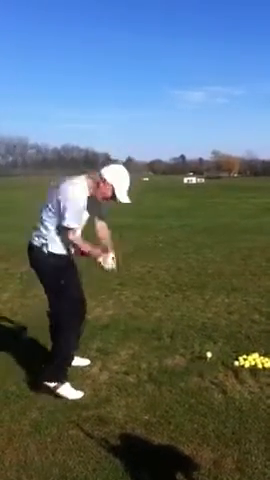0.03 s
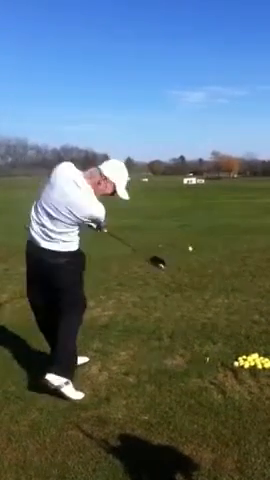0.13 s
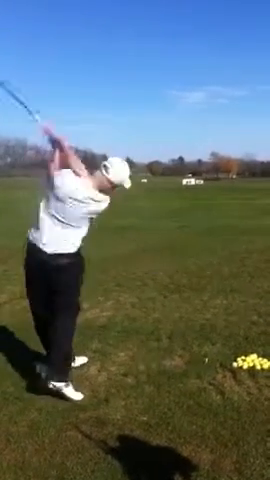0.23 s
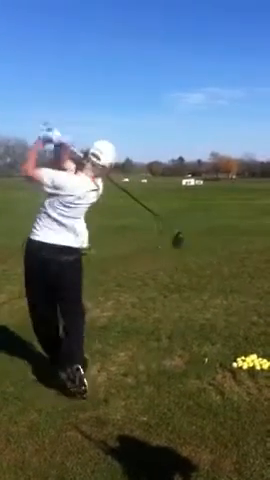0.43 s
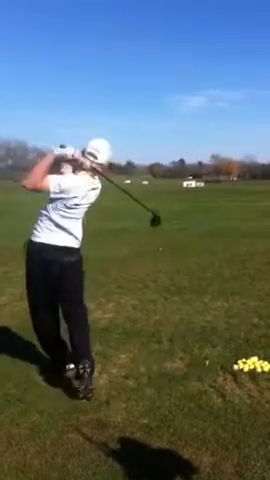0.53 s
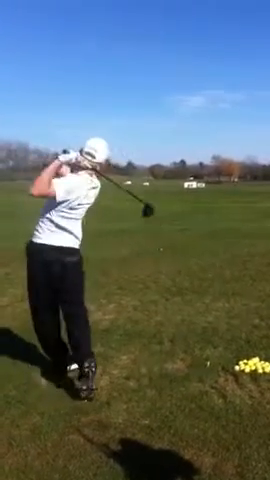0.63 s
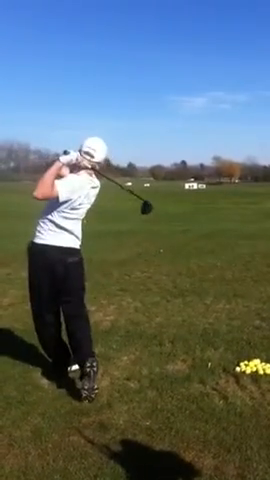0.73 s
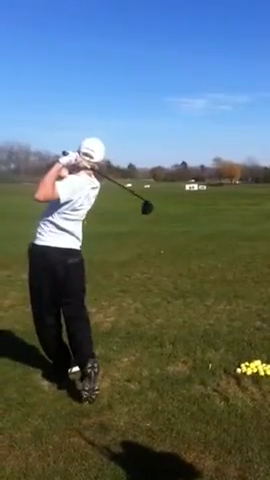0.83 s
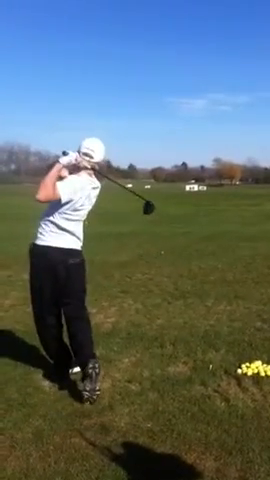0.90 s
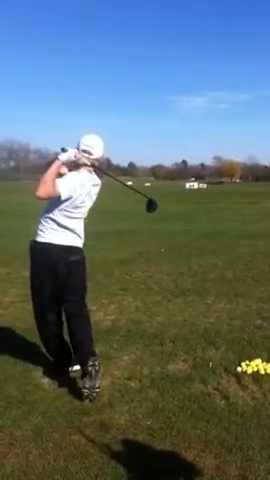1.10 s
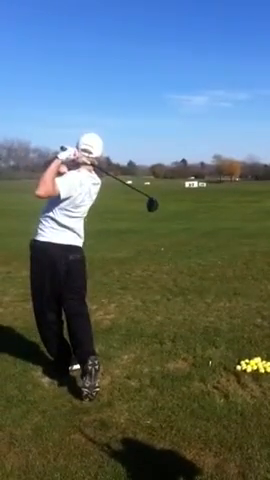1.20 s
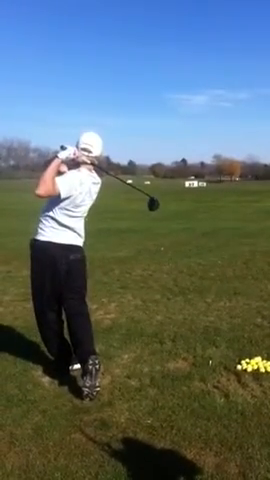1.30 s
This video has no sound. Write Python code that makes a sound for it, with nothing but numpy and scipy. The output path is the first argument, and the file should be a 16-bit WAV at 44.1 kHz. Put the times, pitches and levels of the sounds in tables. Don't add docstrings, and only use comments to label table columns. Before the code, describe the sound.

Golf shot on an open grass range: a fast rising whoosh, a sharp hollow metal crack with brief ringing and scattered echoes, then faint hum, hiss and a dull far strike, on a phone microphone.

```python
import sys
import numpy as np
from scipy import signal
from scipy.fft import rfft, irfft, next_fast_len
from scipy.io import wavfile
from scipy.ndimage import map_coordinates

SR = 44100
rng = np.random.default_rng(int(sys.argv[2]) if len(sys.argv) > 2 else 0)


def generate_wav(sig):
    pcm = np.round(np.clip(np.atleast_2d(sig).T, -1, 1) * 32767).astype(np.int16)
    wavfile.write(sys.argv[1], SR, pcm)


def nominal_scale(level):
    x = np.asarray(level, float) / 20
    return 10 ** x


N = 59535
T = np.arange(N) / SR
HIT_S = 0.2479


def unit(x):
    return x / np.sqrt(np.mean(x ** 2) + 1e-20)


def along(points, hz):
    point_hz, value = np.transpose(points)
    return np.interp(np.log(hz + 1), np.log(point_hz + 1), value)


def wobble(rate):
    return map_coordinates(rng.standard_normal(size=600), [T * rate])


def filtered(x, response):
    size = next_fast_len(len(x) + 8192)
    spectrum = rfft(x, size) * response(np.fft.rfftfreq(size, 1 / SR))
    return irfft(spectrum, size)[:len(x)]


def low_cut(hz, corner_hz):
    return (1j * hz / (corner_hz + 1j * hz)) ** 2


def noise(spectrum, size=N):
    return unit(filtered(rng.standard_normal(size), lambda hz: nominal_scale(along(spectrum, hz))))


def narrow(hz, width_hz):
    def slow_noise():
        return filtered(rng.standard_normal(N), lambda f: 1 / (1 + (2 * f / width_hz) ** 2))

    phase = 2 * np.pi * np.cumsum(hz * np.ones(N)) / SR
    return unit(slow_noise() * np.cos(phase) + slow_noise() * np.sin(phase))


def burst(t60):
    return nominal_scale(-60 * T / t60) * rng.standard_normal(N)


def ring(modes, rise_s, rough_db):
    total = np.zeros(N)
    for hz, db, t60 in modes:
        level_db = db - 60 * T / t60 + rough_db * wobble(260)
        total += nominal_scale(level_db) * np.sin(2 * np.pi * hz * T)
    return (1 - np.exp(-T / rise_s)) * total


def placed(x, s):
    return np.pad(x, (round(s * SR), N))[:N]


def background():
    # pitch_hz [Hz], level_db [dB per Hz]
    traffic_color = [(30, -21), (100, -4), (200, -6.5), (300, -14), (520, -18), (850, -12), (1600, -18.5),
                     (2400, -37), (4000, -62.5)]
    # time_s [s], swell_db [dB]
    gusts = [(0, -2), (.3, -0.5), (.6, 0.1), (.9, 1.1), (1.2, 2.25), (1.35, 2)]
    # pitch_hz [Hz], level_db [dB per Hz]
    hiss_color = [(800, -19.5), (2000, 2), (4000, -2.5), (15100, -7), (16200, -10.5)]
    # pitch_hz [Hz], level_db [dB], width_hz [Hz]
    hum_lines = [(238.7, -60, 1.4), (192, -66.5, 14), (104.4, -71.5, 9.1), (415, -72, 6.055), (590, -73, 6),
                 (835, -74.5, 25)]
    swell_db = np.interp(T, *np.transpose(gusts)) + 0.8 * wobble(21) + 0.8 * wobble(22)
    traffic = nominal_scale(-56.5 + swell_db) * noise(traffic_color)
    hum = sum(nominal_scale(db) * narrow(hz, width) for hz, db, width in hum_lines)
    hiss = nominal_scale(-69.5) * noise(hiss_color)
    return traffic + hum + hiss


def swing():
    # time_s [s], speed [1 = full]
    speed_points = [(.1, .2), (.15, .38), (.175, 0.7), (.197, 0.9), (.23, 0.99), (.247, 0.97), (.262, .55),
                    (.33, 0.57), (.45, .2)]
    # pitch_hz [Hz], width_hz [Hz], level_db [dB]
    vortices = [
        (304.6, 250, -45.5),
        (796.3, 130, -40),
        (1649, 450, -49),
    ]
    # pitch_hz [Hz], level_db [dB per Hz]
    swish_color = [(120, -33.5), (250, -5.5), (800, -3.5), (1650, -14.5), (2650, -15.5), (8000, -18.5),
                   (16000, -20.5)]
    speed_law_db, tone_law_db = 47, 22.5
    speed = np.clip(np.interp(T, *np.transpose(speed_points)), 0.05, 2)
    tones = np.zeros(N)
    for hz, width, db in vortices:
        flutter_db = 0.5 * wobble(70)
        tones += nominal_scale(db + flutter_db) * narrow(hz * np.sqrt(speed), width)
    swish = nominal_scale(-46.5 + 1.5 * wobble(60)) * noise(swish_color)
    decades = np.log10(speed)
    return nominal_scale(speed_law_db * decades) * (nominal_scale(tone_law_db * decades) * tones + swish)


def blow():
    # pitch_hz [Hz], level_db [dB], t60_s [s]
    ball_modes = [(315, -23, 0.014), (840, -17, 0.004), (1015, -13, 0.0094), (1350, -14.5, 0.0024),
                  (1640, -11.5, .007), (2200, -15.5, 0.0035), (2502, -20.5, 0.007), (3417, -12.5, .008),
                  (4200, -6.5, 0.0037), (11400, -14.5, 0.011)]
    # pitch_hz [Hz], level_db [dB], t60_s [s]
    head_modes = [(5500, -25, .08), (5598, -20.5, 0.0893), (5980, -21.5, .07), (6303, -16, 0.056),
                  (6386, -20, 0.1), (6560, -23.5, 0.059), (6650, -25.5, 0.08), (7600, -25, .045),
                  (8540, -27, 0.081), (9240, -27.5, .03), (10330, -31.5, 0.049), (11140, -32, 0.053),
                  (13360, -30, 0.039), (13890, -31, .02)]
    # pitch_hz [Hz], level_db [dB]
    fizz_color = [(2500, -30), (3900, -2), (4800, -11), (6000, 0), (8500, -3), (11000, -7.5),
                  (15500, -16.5)]
    crack = nominal_scale(-5.5) * burst(0.005)
    thud = crack + ring(ball_modes, rise_s=0.0001, rough_db=0)
    thud = filtered(thud, lambda hz: low_cut(hz, 220))
    fizz_t60 = 0.073
    fizz = nominal_scale(-20.5 - 60 * T / fizz_t60) * noise(fizz_color)
    return thud, fizz + ring(head_modes, rise_s=0.00077, rough_db=3)


def field():
    # pitch_hz [Hz], level_db [dB per Hz]
    scatter_color = [(200, -20.5), (1000, -1.5), (2500, -5), (4500, -7.5), (6200, -1), (8500, -2),
                     (12000, -10), (15800, -16)]
    # pitch_hz [Hz], t60_s [s]
    scatter_t60 = [(300, 0.14), (2000, .3), (6000, .4), (14000, .25)]
    rise_s = 0.015
    hz, t, bins = signal.stft(noise(scatter_color), SR, nperseg=256)
    decay = nominal_scale(-60 * t / along(scatter_t60, hz)[:, None])
    tail = signal.istft(bins * decay, SR, nperseg=256)[1][:N]
    return placed(nominal_scale(-35.5) * (1 - np.exp(-T / rise_s)) * tail, HIT_S)


def echoes(thud, head):
    # [t60, s]
    arrivals = [
        (.2833, -14.5, -23.5, .0004),
        (0.2865, -16.5, -11, 0.00027),
        (.339, -31, -25.5, 0.014),
        (0.423, -44, -31, 0.29),
        (.438, -26.5, -34.5, 0.028),
    ]
    # pitch_hz [Hz], level_db [dB]
    echo_color = [(300, 0), (1000, -6), (3000, -8.5), (6000, 1), (12000, 1)]
    air_db_per_s = -40
    out = np.zeros(N)
    for s, thud_db, ring_db, smear in arrivals:
        path = burst(smear)[:SR // 4]
        path = path / np.linalg.norm(path)
        copy = signal.fftconvolve(nominal_scale(thud_db) * thud + nominal_scale(ring_db) * head, path)
        air_db = air_db_per_s * (s - HIT_S)
        out += filtered(placed(copy, s), lambda hz: nominal_scale(along(echo_color, hz) + air_db * (hz / 6500) ** 2))
    return out


def ticks():
    # start_s [s], level_db [dB], pitch_hz [Hz], t60_s [s]
    knocks = [
        (0.5693, -32.5, 4595, 0.0014),
        (.5695, -36, 11130, .001),
        (0.5694, -40, 7700, 0.0012),
        (0.594, -46, 4800, 0.0021),
        (1.3170, -34, 914, 0.0077),
        (1.3172, -47, 5500, .001),
    ]
    return sum(placed(ring([(hz, db, t60)], rise_s=0.00028, rough_db=0), s) for s, db, hz, t60 in knocks)


def scene():
    thud, head = blow()
    direct = placed(thud + head, HIT_S)
    mix = background() + swing() + direct + field() + echoes(thud, head) + ticks()
    return mix[None]


def band_limit(x):
    return signal.sosfilt(signal.butter(12, 16800, fs=SR, output="sos"), x)


def record(dry):
    # start_s [s], step_db [dB]
    ducks = [
        (.2537, -6.5),
        (.2748, -3),
    ]
    # [Hz, dims above]
    treble_dips = [
        (.2365, .2445, 2600),
        (.2695, .2795, 9500),
        (.2975, .3035, 9800),
    ]
    ramp_s, creep_from_s, creep_db_per_s = 0.0005, 0.45, 6
    gain_db = creep_db_per_s * np.clip(T - creep_from_s, 0, None)
    for s, db in ducks:
        gain_db = gain_db + db * np.clip((T - s) / ramp_s, 0, 1)

    def phone_band(hz):
        top_hz = 16000
        return (hz < top_hz) * low_cut(hz, 110) / (1 + (hz / top_hz) ** 20)

    x = filtered(dry[0] * nominal_scale(gain_db), phone_band)
    for start, end, edge_hz in treble_dips:
        gate = np.clip(np.minimum(T - start, end - T) / ramp_s + 0.5, 0, 1)
        gate = gate * (1 - nominal_scale(-20))
        x = x - filtered(gate * x, lambda hz: 1 / (1 + (edge_hz / (hz + 1)) ** 16))
    return band_limit(x[None])


dry = scene()
out = record(dry)
generate_wav(out)
```